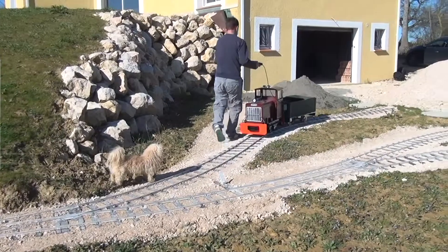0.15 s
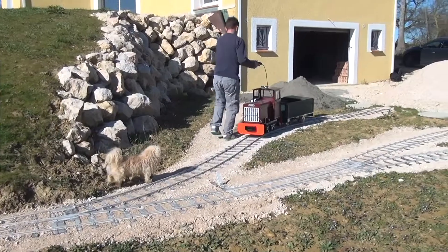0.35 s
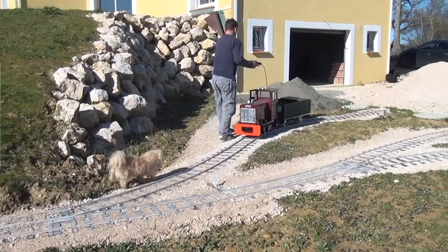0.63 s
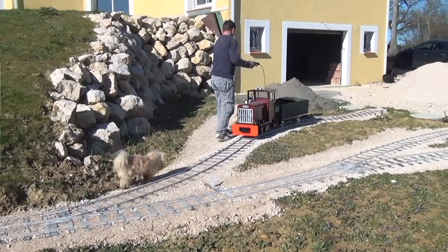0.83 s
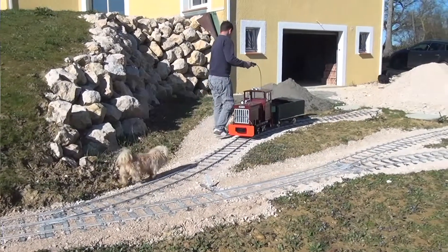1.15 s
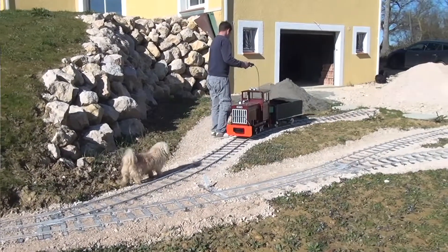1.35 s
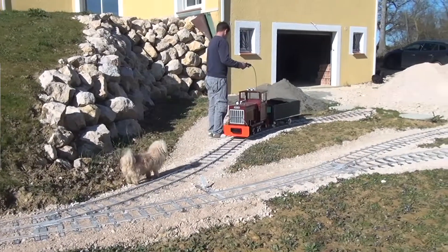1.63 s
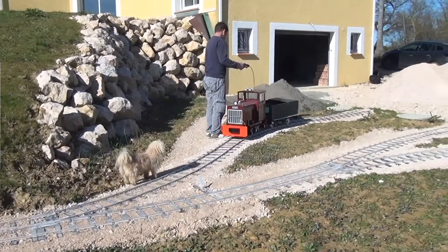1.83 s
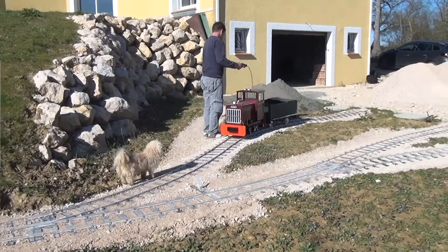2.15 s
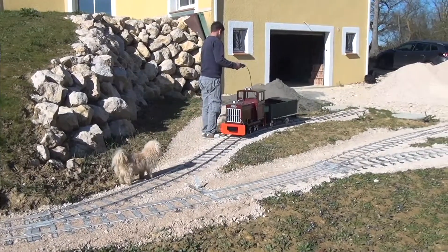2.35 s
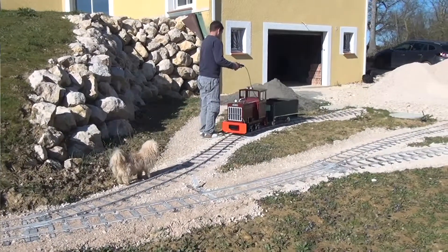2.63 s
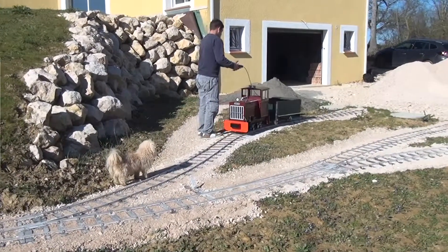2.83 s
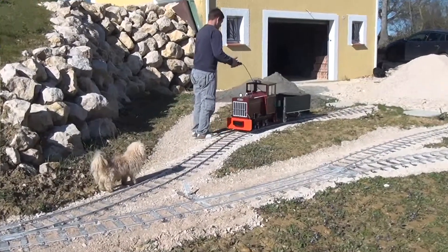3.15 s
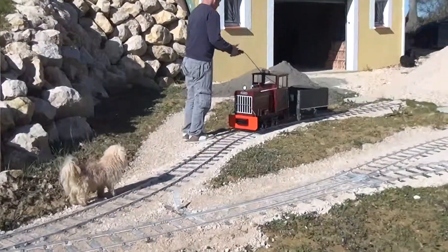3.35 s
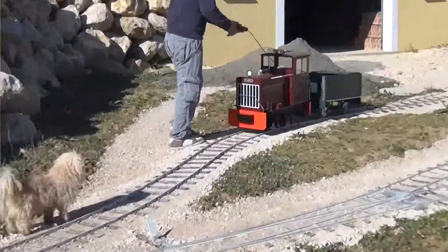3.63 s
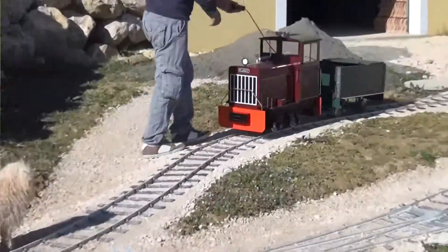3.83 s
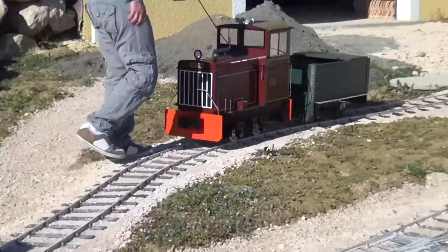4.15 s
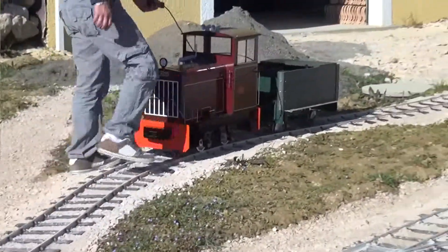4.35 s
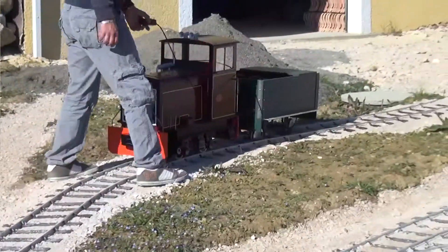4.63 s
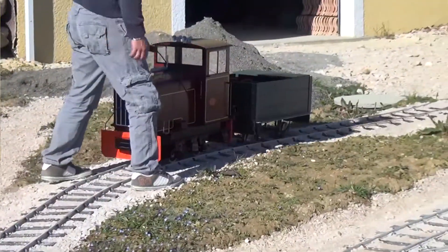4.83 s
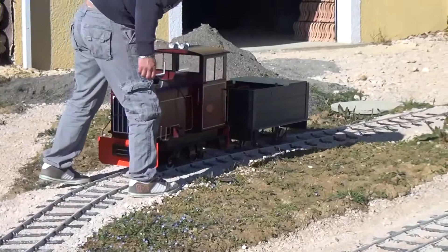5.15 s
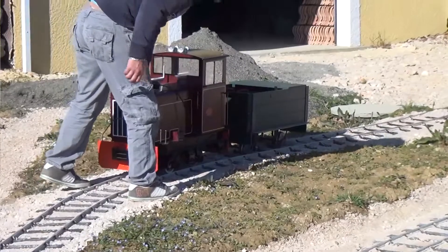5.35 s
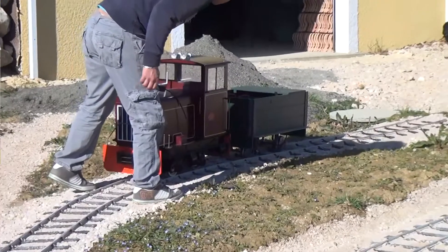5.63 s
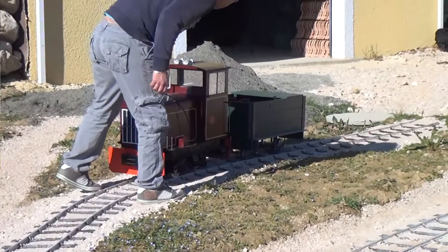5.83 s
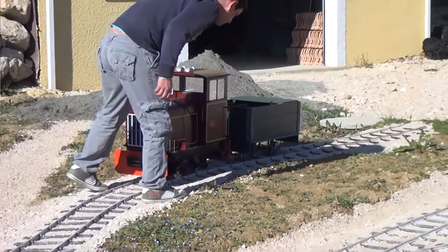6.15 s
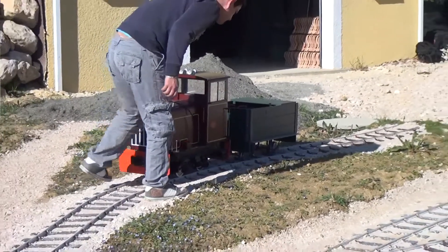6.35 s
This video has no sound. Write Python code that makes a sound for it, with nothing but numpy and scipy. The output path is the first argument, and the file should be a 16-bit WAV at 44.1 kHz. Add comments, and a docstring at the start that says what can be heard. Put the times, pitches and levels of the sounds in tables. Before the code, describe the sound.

Quiet yard air, three tiny bird chirps, then a burst of clattering couplings and wheels, a second jolt, fading ticks and late ringing metal taps.

```python
"""Battery locomotive jolting forward on garden track

Couplings, wheels and gravel knock: bursts of tiny collisions through thud, body, clang and sizzle.
The chassis rattles as dense chatter and ringing grains; the motor hums in shaft orders, the frame booms.
A hand works a latch on the ringing bonnet; a far bird calls in rising whistles. Sparse yard reflections
return these sounds over shaped noise for light wind, far low rumble and air."""
import sys
import numpy as np
from scipy import signal
from scipy.fft import rfft, irfft
from scipy.io import wavfile
from scipy.ndimage import uniform_filter1d

SR = 44100
rng = np.random.default_rng(int(sys.argv[2]) if len(sys.argv) > 2 else 0)


def store_pcm(level_fs):
    """Save levels as 16-bit WAV."""
    pcm = np.round(np.clip(level_fs, -1, 1) * 32767).astype(np.int16)
    wavfile.write(sys.argv[1], SR, np.atleast_2d(pcm).T)


N = 286650


def amp(db):
    """Decibels to gain."""
    return 10 ** (np.asarray(db) / 20)


def evened(x):
    """Scales to rms 1."""
    return x / np.sqrt(np.mean(x ** 2) + 1e-20)


def read(points, hz):
    """Interpolates a spectrum table on a log frequency axis."""
    f, value = np.transpose(points)
    return np.interp(np.log(hz + 1), np.log(f + 1), value)


def level_gain(points, silent_db=-140):
    """Gain at every sample from (time, level) points; silent outside them."""
    s, db = np.transpose(points)
    t = np.arange(N) / SR
    level_db = np.interp(t, s, db)
    level_db[(t < s[0]) | (t > s[-1])] = silent_db
    return amp(level_db)


def smooth_noise(count, first, second):
    """Noise of rms 1 after two moving averages, lengths in samples."""
    noise = uniform_filter1d(rng.standard_normal(count), first)
    return evened(uniform_filter1d(noise, second))


def flutter(count, depth, size):
    """A gain that wobbles randomly about 1, smoothed over size samples."""
    return 1 + depth * smooth_noise(count, size, size)


def resonate(x, hz, width_hz):
    """One resonance: shifts hz down to zero, smooths with one pole, shifts back."""
    turn = np.exp(2j * np.pi * np.cumsum(hz * np.ones(len(x))) / SR)
    r = np.exp(-np.pi * width_hz / SR)
    return 2 * (turn * signal.lfilter([1 - r], [1, -r], x / turn)).real


def resonate_twice(x, hz, first_hz, second_hz):
    """Two cascaded resonances at one pitch give steeper skirts."""
    return resonate(resonate(x, hz, first_hz), hz, second_hz)


def chatter(shape, per_s, spread_db, bed=0.78):
    """Tiny collisions of uneven size, over a bed of fine noise."""
    size = amp(spread_db * np.minimum(rng.exponential(1, shape), 3))
    hits = size * (rng.random(shape) < per_s / SR)
    return rng.standard_normal(shape) * (hits + bed)


def peaks_db(peaks, hz, width):
    """Summed resonance peaks; width is a share of each pitch."""
    return sum(db / (1 + (2 * (hz / f - 1) / width) ** 2) for f, db in peaks)


# chassis colour: (frequency [Hz], level [dB per Hz])
CHASSIS_COLOUR = [(60, -65), (130, -8), (200, 1.5), (340, -2), (480, -0.5), (640, 1), (1100, -4.5),
                  (1750, -6), (2500, -7.5), (3300, -13), (4200, -14.5), (5500, -11), (7000, -15.5),
                  (9000, -24.5), (11500, -19.5), (14000, -33)]
# frame resonances: (frequency [Hz], height over the colour [dB])
FRAME_MODES = [(240, 2.1), (352, 7.5), (646, 1.95), (950, 5.4), (1260, 5.7), (1475, 5.4), (1760, 5.1),
               (2300, 1.2), (2830, 1.5), (3570, 1.8)]


def bands(x, shimmer=()):
    """Chassis-coloured x split into thud (< 1 kHz), body and sizzle (> 4 kHz), each of rms 1."""
    hz = np.fft.rfftfreq(x.shape[-1], 1 / SR)
    colour_db = read(CHASSIS_COLOUR, hz) + peaks_db(FRAME_MODES, hz, width=0.01)
    z = rfft(x) * amp(colour_db) * amp(peaks_db(shimmer, hz, width=0.033))
    low = 1 / (1 + (hz / 1000) ** 4)
    high = 1 / (1 + (4000 / (hz + 1)) ** 6)
    return [evened(irfft(z * share, x.shape[-1])) for share in (low, 1 - low - high, high)]


# small parts a blow sets ringing: (frequency before stray [Hz], height before random scaling [dB])
SHIMMER_MODES = [(5600, 5.3), (11300, 4.2)]


def blows(rows, modes, crest_db=4, clang_db=-5.5, thud_lasts=2.24, thud_rise_s=0.016):
    """Each blow drives chatter through the part it strikes; the treble dies sooner, the thud later."""
    t = np.arange(SR // 2) / SR
    out = np.zeros(N + SR)
    grits = chatter((len(rows), len(t)), per_s=5000, spread_db=0.18)
    for (s, peak_db, sizzle_db, t60_s, clang_hz, *ring_db), grit in zip(rows, grits):
        t60_s = max(t60_s, .005)
        # high or hard blows thud less
        thud_db = -3 - 6.5 * np.log2(clang_hz / 1000) - 0.2956 * (peak_db + 40)
        shimmer = [(f * (1 + rng.uniform(-0.1476, 0.12)), db * rng.uniform(0, 1.47))
                   for f, db in SHIMMER_MODES]
        thud, body, sizzle = bands(grit, shimmer)
        width_hz = .15 * clang_hz
        clang = evened(resonate_twice(grit, clang_hz, width_hz, width_hz))
        # dull or soft blows clang more
        clang_gain = amp(clang_db - .3 * min(sizzle_db, 0) - .15 * (peak_db + 31.5))
        body = body + clang_gain * clang
        start = slice(0, round(0.18 * t60_s * SR))  # first collisions set the strength
        body, sizzle = body / np.std(body[start]), sizzle / np.std(sizzle[start])

        fall_db = -60 * t / t60_s
        blow = amp(-crest_db + fall_db) * body + amp(sizzle_db + 2 * fall_db) * sizzle
        rise_s = min(.05 * t60_s, .002)  # long blows scrape in more slowly
        blow = blow * (1 - np.exp(-(t / rise_s) ** 2))
        swell = 1 - np.exp(-t / thud_rise_s)
        mass = min(t60_s / .04, 1) ** 2  # short blows move less mass
        blow = blow + amp(thud_db + fall_db / thud_lasts) * thud * swell * mass

        ring = 0
        for hz, db, mode_t60_s in modes:
            tone = amp(db - 60 * t / mode_t60_s) * np.sin(2 * np.pi * hz * t)
            rise = 1 - np.exp(-t * hz / 3)  # builds up within a few turns
            ring = ring + tone * flutter(len(t), depth=.3, size=300) * rise
        out[round(s * SR):][:len(t)] += amp(peak_db) * (blow + ring * amp(sum(ring_db)))
    return out[:N]


# couplings, wheels and gravel:
# (time [s], peak level [dB], sizzle from the peak [dB], t60 [s], clang [Hz])
KNOCK_EVENTS = [(.03, -58, -14, 0.1, 614), (.068, -63, 1, 0.25, 1000), (0.2719, -54, -1, 0.041, 620),
                (0.3146, -53, 2, 0.047, 930), (.336, -53.5, -31, 0.058, 1060), (0.4667, -58, 1, 0.057, 616),
                (0.4874, -45.5, -39, 0.032, 1230), (.618, -54, -34, 0.037, 1210),
                (0.6675, -50.5, -8, 0.034, 630), (.838, -57, -5, 0.05, 1520), (0.9195, -73, 27, 0.024, 525),
                (1.0224, -55.5, 8.5, 0.011, 401), (1.2607, -53.5, -5, 0.028, 1790),
                (1.5788, -48, -9.5, 0.063, 1130), (2.0517, -27, -4.5, 0.024, 2000),
                (2.1102, -63, -19, 1, 1270), (2.303, -41.5, -25, 0.044, 820),
                (2.3205, -22, -16.5, 0.12, 1650), (2.3285, -16.5, -5.5, 0.064, 1740),
                (2.3434, -35.5, 6, 0.14, 1680), (2.352, -34, 0, 0.039, 1730),
                (2.3665, -18, -33, 0.035, 606), (2.3715, -21, -19, 0.061, 1860),
                (2.3935, -22.5, -20, 0.041, 1140), (2.4564, -30.5, 3, 0.063, 1740),
                (2.491, -26, -8, 0.1, 970), (2.515, -28, -6, 0.032, 710), (2.5465, -40.5, 6, 0.027, 835),
                (2.568, -33.5, 0, 0.096, 1690), (2.575, -26.5, -3.5, 0.026, 1570),
                (2.5865, -21, 0, 0.014, 1450), (2.6085, -41.5, 5, 0.067, 1690),
                (2.624, -44, -27, 0.075, 610), (2.6745, -38.5, -9.5, 0.11, 996),
                (2.7535, -29.5, -55, 0.036, 254), (2.7534, -24.5, -6, 0.14, 1780),
                (2.7788, -40, -1.5, 0.2, 553), (2.822, -20.5, -14, 0.017, 2390),
                (2.873, -42.5, -1, 0.095, 2300), (2.8809, -29, -18.5, 0.079, 600),
                (2.9031, -35, -43, 0.095, 1730), (2.957, -46.5, -24, 0.33, 1760),
                (3.0609, -33, -2.5, 0.23, 1663), (3.0985, -34, -21, 0.045, 490),
                (3.163, -42, -16, 0.082, 1800), (3.176, -36.5, -46, 0.087, 896),
                (3.2561, -30.5, -8.5, 0.061, 1310), (3.293, -50, 10, 0.049, 1300),
                (3.3009, -32, -4, 0.074, 1490), (3.3514, -34, -26, 0.02, 1990),
                (3.3633, -30.5, -47, 0.018, 2450), (3.3999, -36, -9, 0.057, 1780),
                (3.4252, -41, 1, 0.067, 630), (3.463, -53, -8, 0.33, 1770), (3.5564, -38, -7, 0.054, 1800),
                (3.682, -54, -26, 0.059, 1500), (3.7735, -53.5, -15, 0.28, 2350),
                (3.8305, -22, -12, 0.056, 1030), (3.8355, -17.5, -13.5, 0.049, 1870),
                (3.8465, -21.5, -10, 0.048, 1780), (3.864, -36, 2, 0.056, 990),
                (3.8765, -35, 0.5, 0.11, 630), (3.9298, -28.5, -38, 0.035, 530),
                (3.9823, -33.5, -12, 0.071, 1790), (4.0045, -39, -7, 0.059, 2320),
                (4.064, -48, -22, 0.04, 1750), (4.1113, -39, -57, 0.016, 1060),
                (4.1854, -45, -19, 0.11, 1840), (4.2297, -43, -61, 0.029, 387),
                (4.2941, -45, -1.5, 0.033, 1550), (4.361, -50.5, -13, 0.033, 704),
                (4.4432, -45, -29, 0.033, 950), (4.4759, -45.5, -1.5, 0.069, 2330),
                (4.495, -49, -25, 0.025, 596), (4.5241, -57, 15.5, 0.021, 1180),
                (4.5664, -45, -59, 0.036, 936), (4.5959, -54, -7, 0.056, 990),
                (4.6768, -44.5, -24, 0.02, 1230), (4.7135, -49, -6, 0.042, 2680),
                (4.7735, -52, -8, 0.043, 1330), (4.823, -55, -4, .03, 1190), (4.8583, -48, -13, 0.03, 1280),
                (4.8855, -59, -5, 0.03, 1560)]


def knocks():
    """Couplings, wheels and gravel strike without bonnet ring."""
    return blows(KNOCK_EVENTS, [])


# loose parts and gravel: (time [s], level [dB])
RATTLE_LEVEL = [(0, -59), (.25, -69.5), (.9, -73), (2.0, -74.5), (2.28, -63.5), (2.4, -48.5), (2.53, -47),
                (2.66, -52), (2.8, -45.5), (3.13, -49.5), (3.23, -56), (3.33, -47.5), (3.5, -62.5),
                (3.79, -65.5), (3.85, -39), (4.04, -56), (4.25, -66.5), (4.9, -67.5), (5.0, -73),
                (5.9, -88), (6.5, -71.5)]
# a shoe scuffs gravel, or parts shake out after a blow:
# (start [s], length [s], level [dB], treble from the level [dB])
SCUFF_EVENTS = [(0.4, 0.22, -70.5, -5.5), (0.711, 0.11, -70.5, 2.5), (1.23, 0.17, -71.5, -6),
                (1.833, 0.092, -65.5, -36), (3.862, 0.19, -69.5, 4), (4.851, 0.067, -67.5, -17),
                (6.105, 0.17, -68.5, -11)]


def rattle(thud_db=-2.5, treble_db=-13, grain_db=4, jolt_db=2):
    """Dense chatter plus grains, each ringing one frame resonance, in small jolts and brief swells."""
    t = np.arange(N) / SR
    level = level_gain(RATTLE_LEVEL)
    treble = level * amp(treble_db)
    for s, length_s, db, scuff_treble_db in SCUFF_EVENTS:
        swell = np.sqrt(np.sin(np.pi * np.clip((t - s) / length_s, 0, 1)).clip(0))
        level = level + amp(db) * swell
        treble = treble + amp(db + scuff_treble_db) * swell
    thud, body, sizzle = bands(chatter(N, per_s=900, spread_db=3))
    grains = np.zeros(N)
    grits = chatter((len(FRAME_MODES), N), per_s=120, spread_db=5.0, bed=.06)
    for (f, db), grit in zip(FRAME_MODES, grits):
        ringing = evened(resonate_twice(grit, f, .1 * f, .1 * f))
        grains += amp(read(CHASSIS_COLOUR, f) + db) * np.sqrt(f) * ringing  # dB per Hz to band level
    jolts = evened(amp(jolt_db * smooth_noise(N, 500, 300)))
    full = evened(amp(thud_db) * thud + body + amp(grain_db) * evened(grains))
    return (level * full + treble * sizzle) * jolts


# (multiple of the shaft speed, level from the first order [dB])
SHAFT_ORDERS = [(1, 0), (2, -2.5), (3, -9.5), (5, -3)]


def motor(on_s=2.6, off_s=3.17, fade_s=0.08, level_db=-57.5, slow_hz=141.6, fast_hz=149.4, waver=.2):
    """Fluttering shaft orders; the speed arches from slow to fast and back, wavering a little."""
    t = np.arange(N) / SR
    arch = np.sin(np.pi * np.clip((t - on_s) / (off_s - on_s), 0, 1))
    hz = slow_hz + (fast_hz - slow_hz) * arch
    load = np.clip(np.minimum(t - on_s, off_s - t) / fade_s, 0, 1)
    turns = np.cumsum(hz * (1 + waver * uniform_filter1d(rng.standard_normal(N), 1500))) / SR
    hum = np.zeros(N)
    for k, db in SHAFT_ORDERS:
        tone = np.sin(2 * np.pi * (k * turns + rng.random()))
        hum += amp(db) * flutter(N, depth=.25, size=2500) * tone
    return np.sqrt(2) * amp(level_db) * load * hum


# (peak time [s], peak level [dB], rise [dB/s], fall [dB/s])
BOOM_EVENTS = [(2.34, -51, 60, 170), (3.47, -52, 70, 150)]


def frame_boom(hz=177.8, rough=.7):
    """A narrow frame resonance, part steady tone and part resonant noise, swells and dies."""
    t = np.arange(N) / SR
    tone = np.sqrt(2) * np.sin(2 * np.pi * hz * t)
    shake = evened(resonate_twice(rng.standard_normal(N), hz, 17.4, 20.7))
    level = sum(amp(db - np.maximum(rise * (s - t), fall * (t - s))) for s, db, rise, fall in BOOM_EVENTS)
    return level * evened((1 - rough) * tone + rough * shake)


# (time [s], peak level [dB], sizzle from the peak [dB], t60 [s], clang [Hz], ring from the peak [dB])
TAP_EVENTS = [(5.1378, -48, -12, 0.038, 1580, -12), (5.187, -44.5, -2, 0.11, 1240, 5),
              (5.3248, -57, -21, 0.05, 1630, -9), (5.7043, -59, -2, 0.053, 2050, -10),
              (6.0651, -27.5, 0.5, 0.081, 2080, -12), (6.0735, -39.5, -21, 0.094, 538, 3.5),
              (6.1105, -37, -8, 0.14, 1700, -2), (6.2232, -49.5, -39, 0.14, 1630, 0.5)]
# (frequency [Hz], level from the ring of a tap [dB], t60 [s])
BONNET_MODES = [(349, -23.5, 0.59), (503.5, -12, 0.41), (667, -17.5, 0.17), (797, -30.5, 0.33),
                (970, -15.5, 0.31), (1182, -9, 0.14), (1255, -9.5, 0.31), (1345, -8.5, 0.23),
                (1577, -13, 0.15), (1846, -13, 0.16), (1920, -25, 0.29), (2030, -28, 0.33)]


def bonnet_taps():
    """A hand works a latch; each blow rings the bonnet's modes."""
    return blows(TAP_EVENTS, BONNET_MODES)


# (time [s], level [dB])
CHIRP_EVENTS = [(1.343, -70), (1.449, -68.5), (1.558, -70)]
# three rising whistles at once, then a steep flick:
# (delay [s], length [s], start [Hz], end [Hz], level from the chirp [dB])
CALL_NOTES = [(.003, .017, 6500, 7600, -6), (0, .024, 5300, 7000, -2), (.002, .024, 4850, 5700, -3),
              (.027, .018, 4200, 6900, 0)]


def bird():
    """Short, hoarse rising whistles: gliding sines with fast flutter, the same call each time."""
    out = np.zeros(N)
    for s, db in CHIRP_EVENTS:
        for delay_s, length_s, from_hz, to_hz, note_db in CALL_NOTES:
            t = np.arange(0, length_s, 1 / SR)
            hz = from_hz + (to_hz - from_hz) * (t / length_s) ** .75
            note = np.sin(2 * np.pi * np.cumsum(hz) / SR)
            note = note * flutter(len(t), depth=.4, size=20) * np.sqrt(np.hanning(len(t)))
            out[round((s + delay_s) * SR):][:len(t)] += amp(db + note_db) * note
    return out


def widen(x, near_db=-21):
    """Nearby surfaces reach the two ports differently, mostly in the middle range."""
    scatter = rng.standard_normal(1500) * np.exp(-np.arange(1500) / 250)
    side = amp(near_db) * signal.oaconvolve(x, scatter / np.linalg.norm(scatter))[:N]
    side = signal.lfilter(*signal.butter(1, [400, 13000], "band", fs=SR), side)
    return x * amp([[-.2], [.2]]) + np.array([side, -side])


# reverberation: (frequency [Hz], t60 [s])
YARD_T60 = [(200, .45), (1000, .4), (3000, .25), (10000, .16)]


def yard(x, level_db=-18, unlike=0.01):
    """Yard walls: sparse reflections of random sign, each band dying at its own speed."""
    taps = np.zeros((2, SR // 2))
    at = np.arange(300, SR // 2 - 20, 20) + rng.integers(0, 20, (2, (SR // 2 - 301) // 20))
    np.put_along_axis(taps, at, rng.choice([-1., 1.], at.shape), 1)
    taps = np.array([taps[0] + unlike * taps[1], taps[0] - unlike * taps[1]])
    hz, t, z = signal.stft(taps, SR, nperseg=256)
    fall = amp(-60 * t / read(YARD_T60, hz)[:, None])
    tail = signal.istft(z * fall, SR, nperseg=256)[1]
    tail = tail / np.linalg.norm(tail[0])
    return amp(level_db) * signal.fftconvolve(x[None], tail, axes=1)[:, :N]


# left-right likeness: (frequency [Hz], correlation [0-1])
LIKENESS = [(60, 0.86), (200, 1), (370, 0.87), (1300, 0.16), (4400, 0.46), (4900, 1), (14000, 1)]


def hush(colour, patchy_db, smooth_hz=1500):
    """Stereo noise from random short-time spectra; drifting patches weaken above smooth_hz."""
    frames, hz = N // 256 + 5, np.fft.rfftfreq(1024, 1 / SR)
    a, b, c, d, patches = rng.standard_normal((frames, 513, 5)).T
    patches = evened(uniform_filter1d(uniform_filter1d(patches, 10, 0), 12, 1))
    same = np.clip(read(LIKENESS, hz), -1, 1)[:, None]
    left = a + 1j * b
    right = same * left + np.sqrt(1 - same ** 2) * (c + 1j * d)
    patch_db = patchy_db * patches / (1 + hz[:, None] / smooth_hz)
    z = np.array([left, right]) * amp(read(colour, hz)[:, None] + patch_db)
    return evened(signal.istft(z, nperseg=1024, noverlap=768)[1][:, :N])


# (time [s], level [dB])
WIND_LEVEL = [(0, -79), (.4, -81), (.9, -104), (1.25, -79), (1.35, -68), (2.0, -75.5), (2.9, -65.5),
              (3.4, -80), (3.9, -73.5), (4.3, -79), (5.1, -83), (5.3, -69), (5.8, -101), (6.5, -87)]
# (frequency [Hz], level [dB per Hz])
WIND_SPECTRUM = [(25, -15), (80, -2.5), (120, 18), (200, -70)]


def wind():
    """Light wind on the microphone: low noise of varying level."""
    return level_gain(WIND_LEVEL) * hush(WIND_SPECTRUM, patchy_db=0.0)


# (time [s], level [dB])
RUMBLE_LEVEL = [(0.0, -59.5), (.4, -68), (1.07, -81), (1.9, -69.5), (2.51, -68), (3.26, -55), (3.51, -63),
                (4.71, -80), (6.5, -99.5)]
# (frequency [Hz], level [dB per Hz])
RUMBLE_SPECTRUM = [(60, -38), (130, -5.5), (190, 8), (300, 0), (500, -26.5)]


def rumble():
    """Far low rumble: slightly patchy low noise of varying level."""
    return level_gain(RUMBLE_LEVEL) * hush(RUMBLE_SPECTRUM, patchy_db=0.5)


# (frequency [Hz], level [dB per Hz])
AIR_SPECTRUM = [(25, -48), (80, -4), (129, -0.5), (187, 5), (382, -8), (1820, -9), (2940, -13.5),
                (4480, -13.5), (6330, -15.5), (11600, -18), (14000, -18.5)]


def air(level_db=-68.5):
    """Steady broadband noise with drifting patches."""
    return amp(level_db) * hush(AIR_SPECTRUM, patchy_db=5.5)


def scene():
    """Train, taps and bird slightly right of centre, in the yard, over wind, rumble and air."""
    near = knocks() + rattle() + motor() + frame_boom() + bonnet_taps() + bird()
    return widen(near) + yard(near) + wind() + rumble() + air()


def record(dry, bass_hz=45, edge_hz=13800):
    """A bass roll-off and a treble band limit."""
    ports = signal.lfilter(*signal.butter(2, bass_hz, "high", fs=SR), dry)
    limit = signal.firwin(511, edge_hz, window=("kaiser", 9), fs=SR)
    return signal.oaconvolve(ports, limit[None], "same")


dry = scene()
out = record(dry)
store_pcm(out)
```